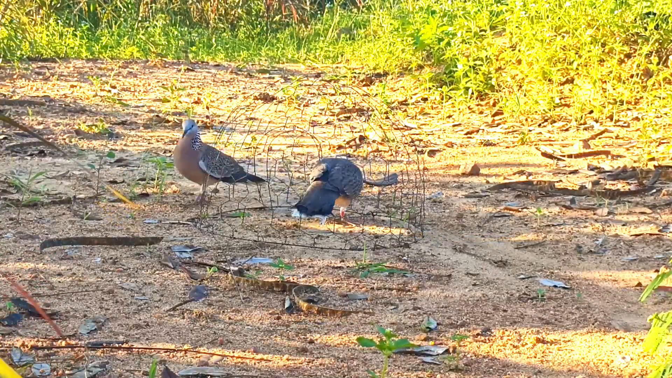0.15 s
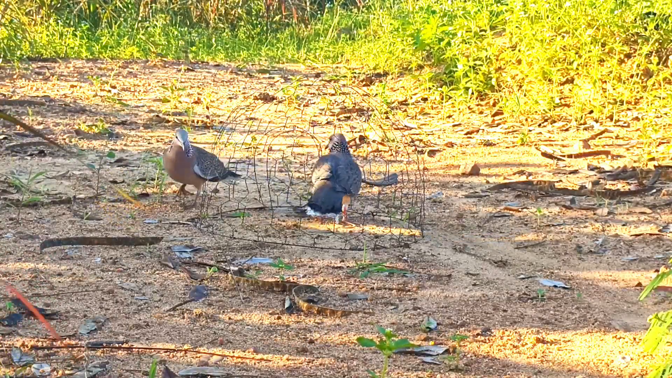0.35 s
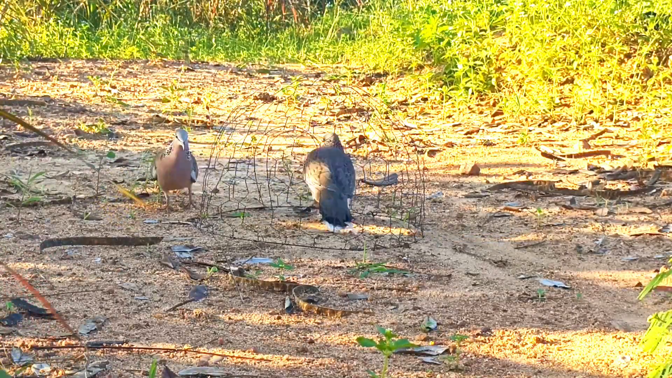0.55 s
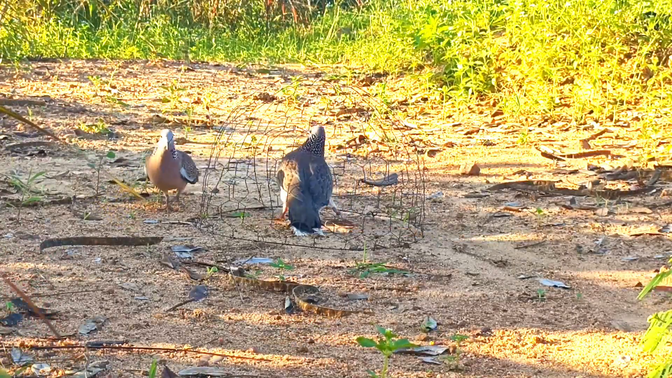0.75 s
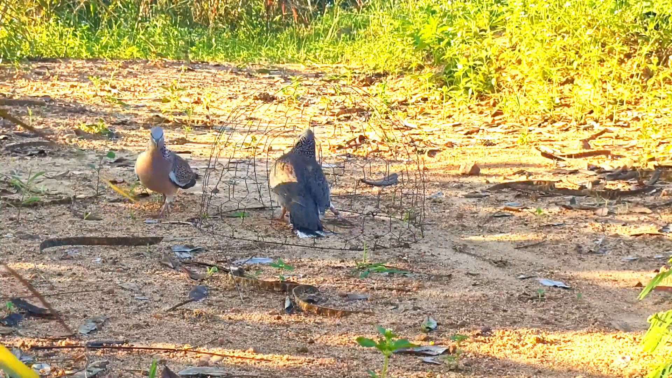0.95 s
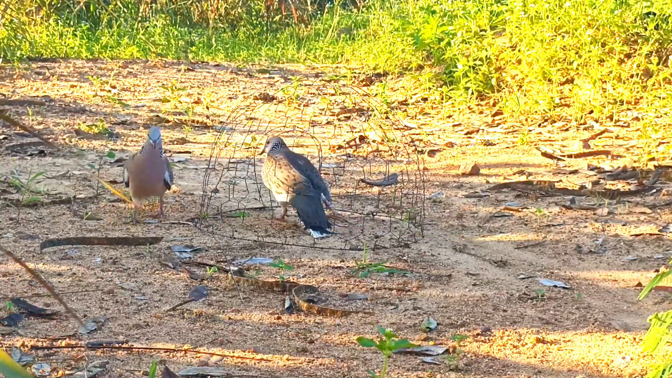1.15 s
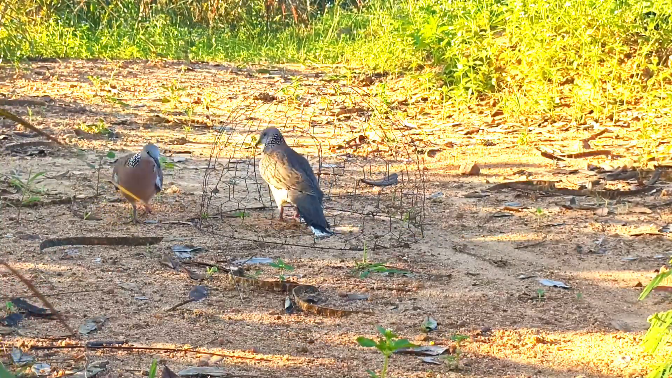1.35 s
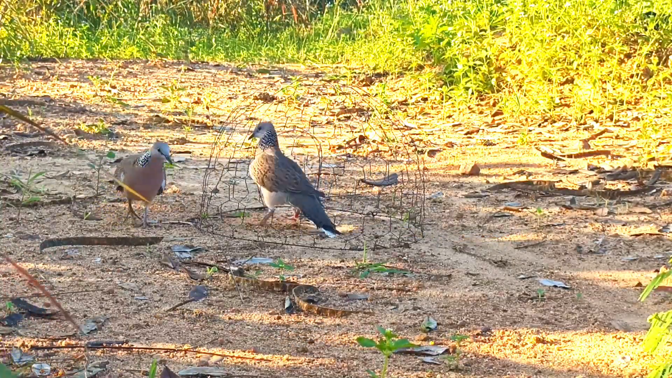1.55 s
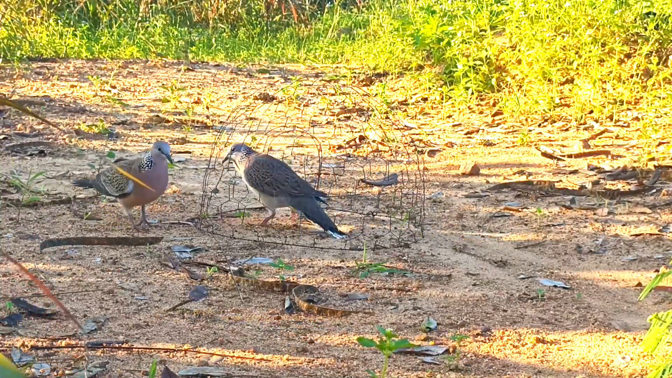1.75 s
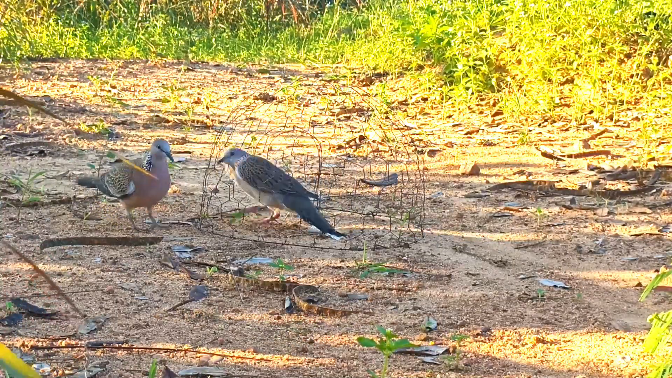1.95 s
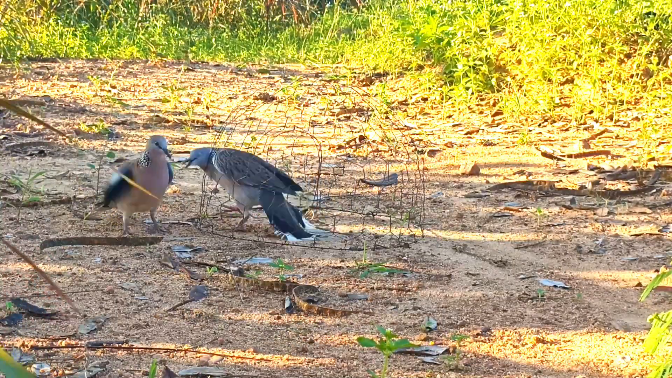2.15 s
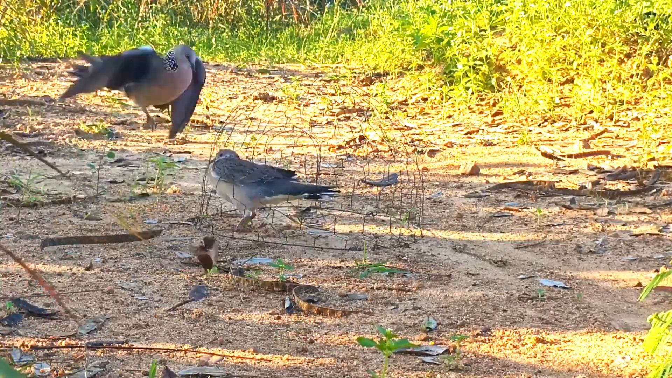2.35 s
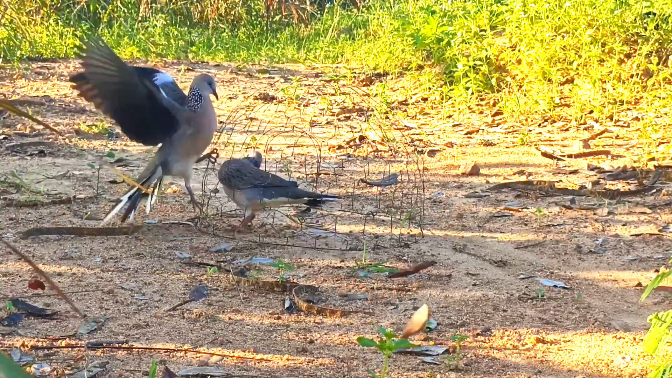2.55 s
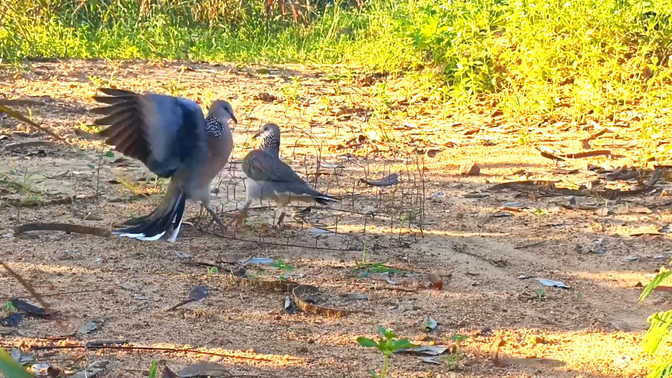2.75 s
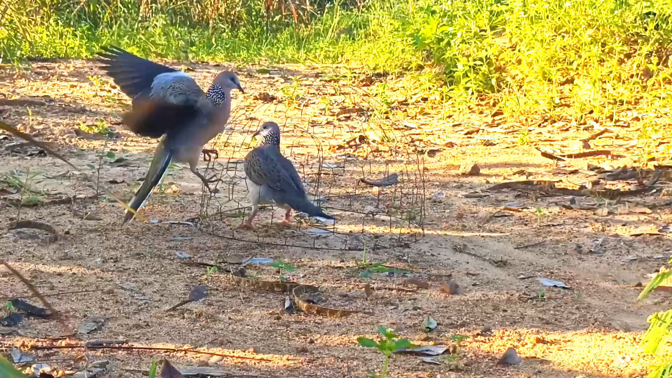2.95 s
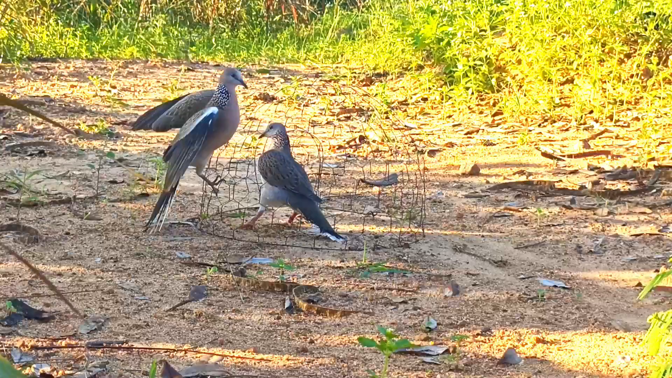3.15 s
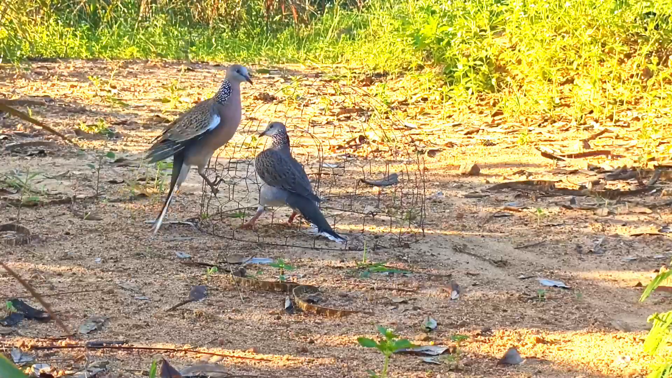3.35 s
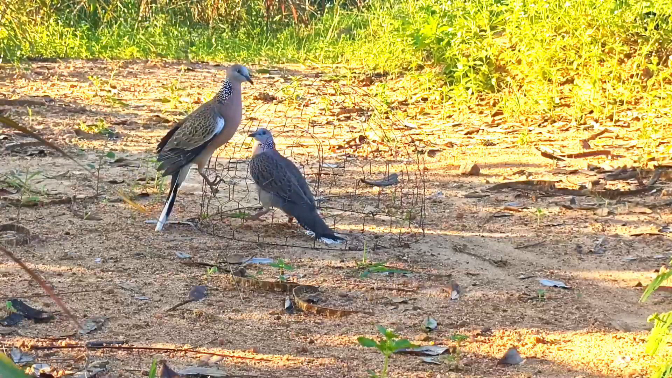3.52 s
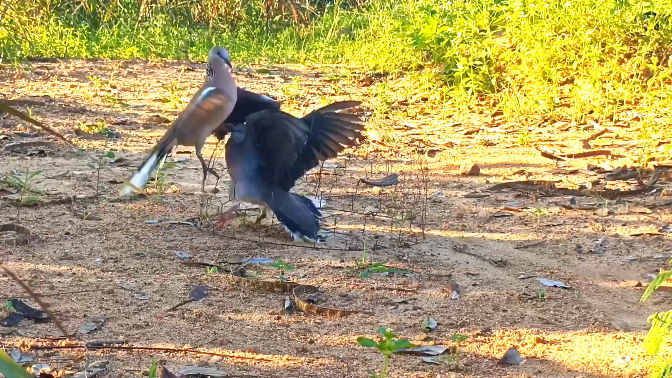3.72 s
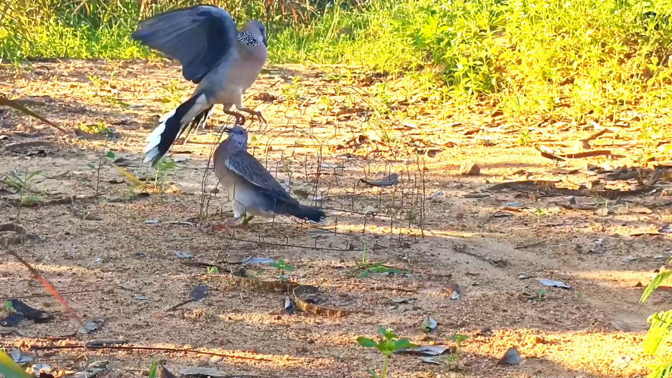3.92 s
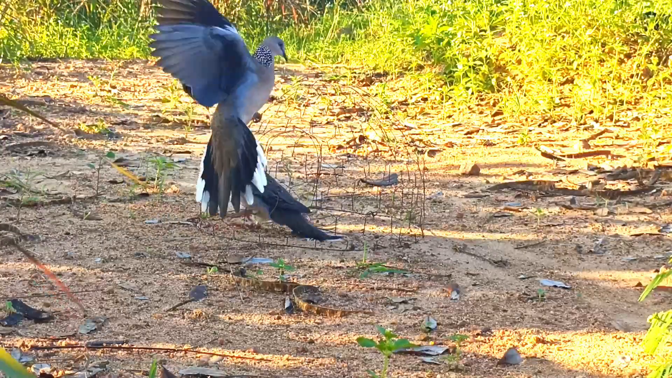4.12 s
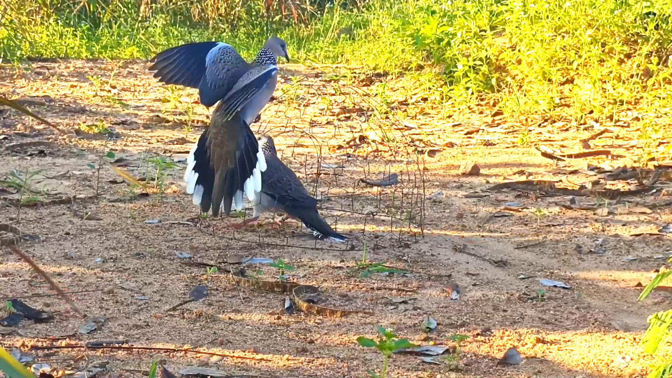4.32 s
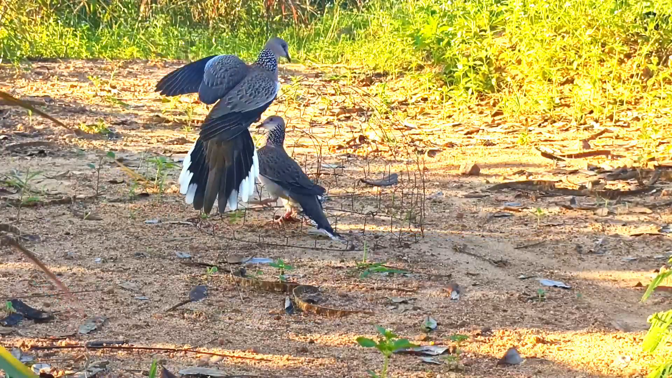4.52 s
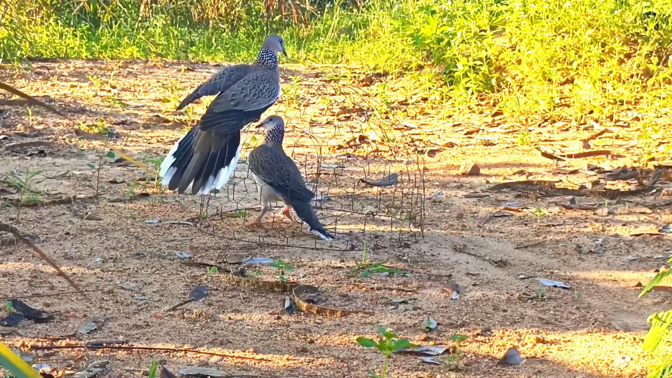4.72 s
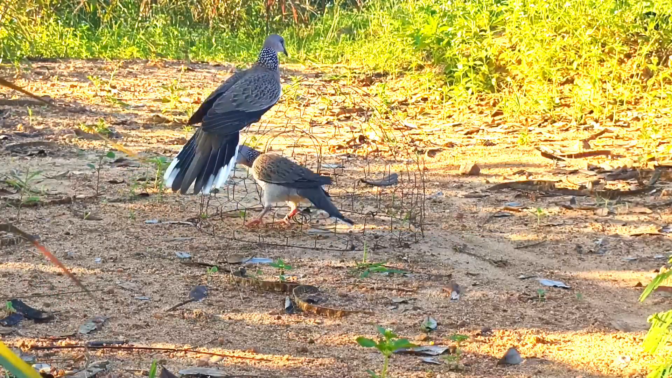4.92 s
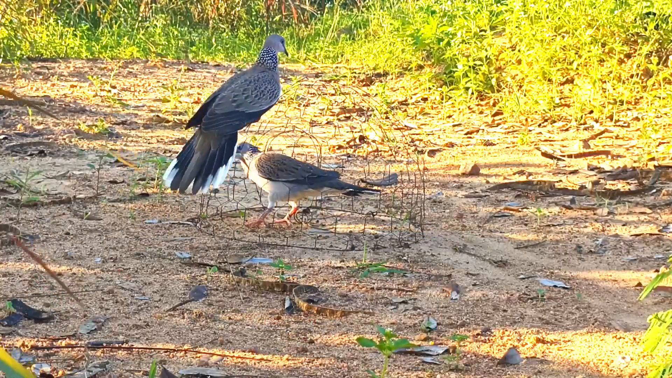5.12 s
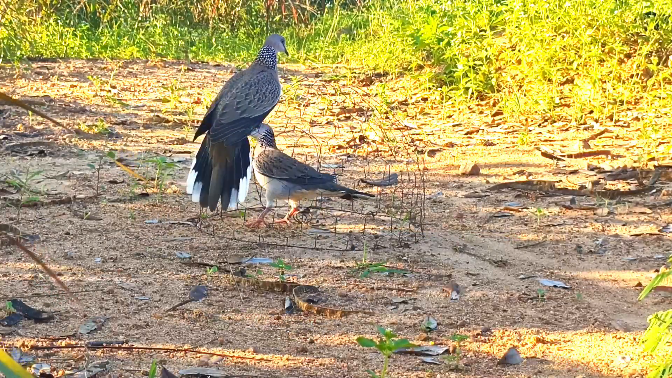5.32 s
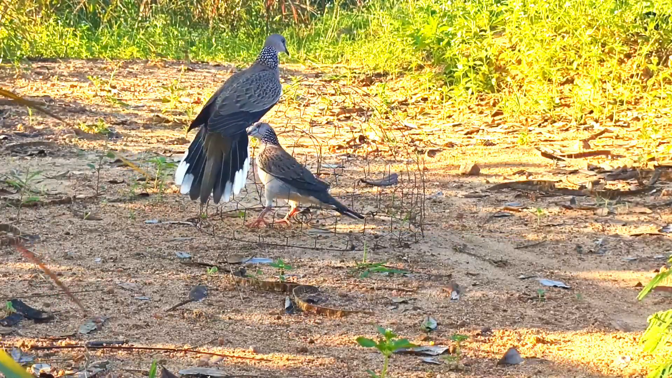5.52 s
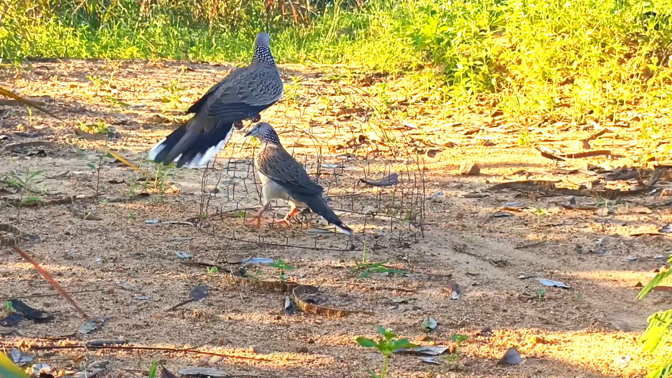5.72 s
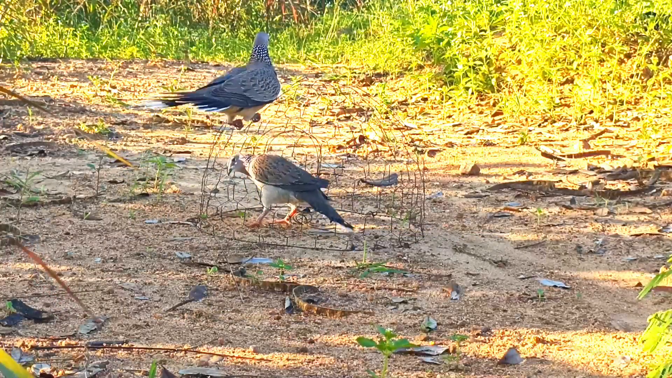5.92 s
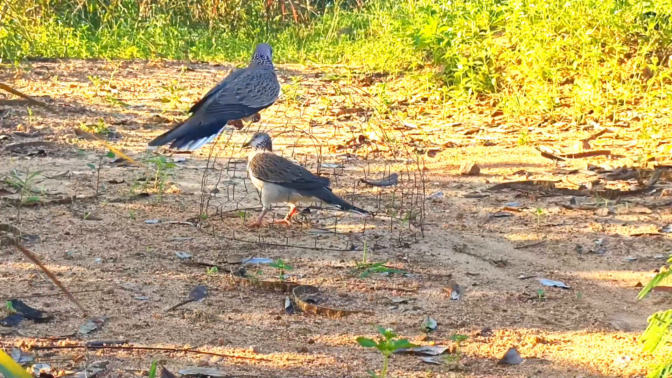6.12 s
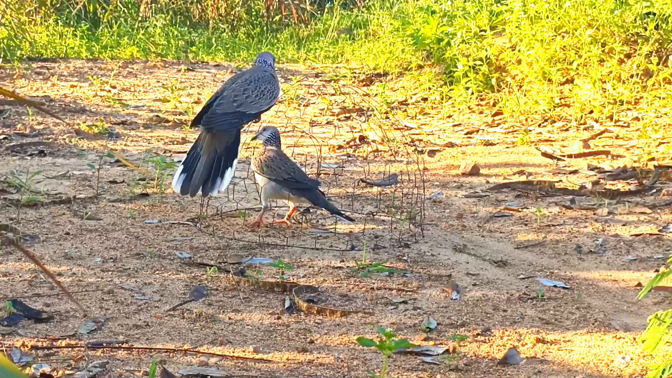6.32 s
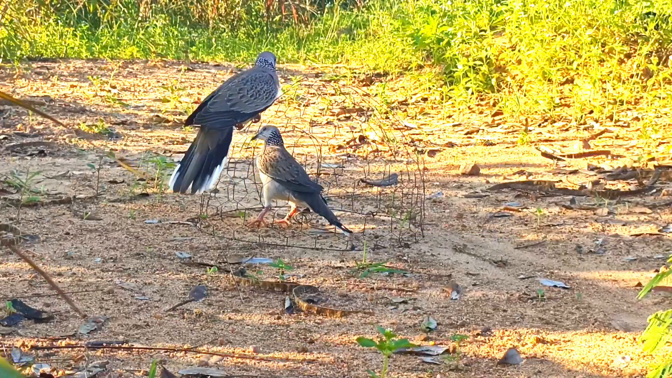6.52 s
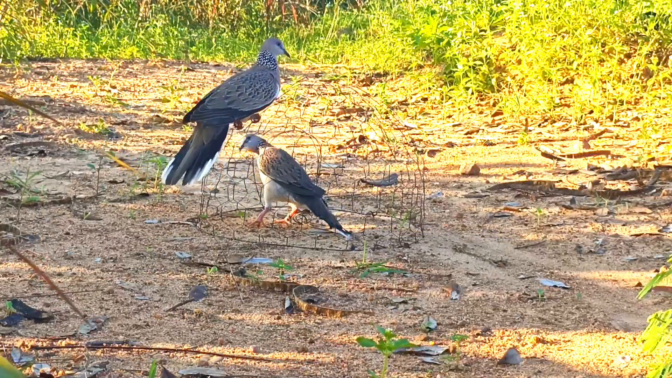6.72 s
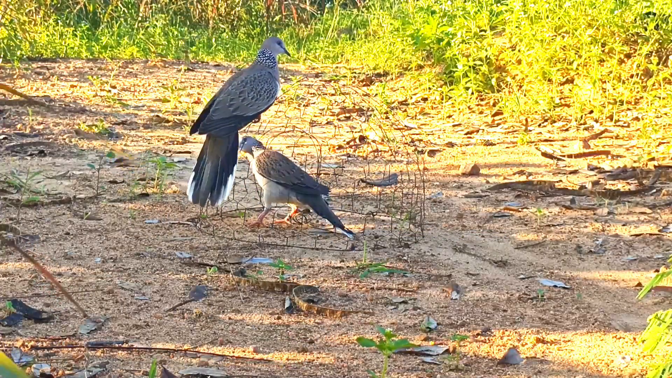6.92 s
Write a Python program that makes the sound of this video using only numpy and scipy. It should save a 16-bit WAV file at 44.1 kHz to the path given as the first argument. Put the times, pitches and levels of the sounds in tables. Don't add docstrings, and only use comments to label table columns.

```python
import sys
import numpy as np
from scipy import signal
from scipy.fft import rfft, irfft, next_fast_len
from scipy.io import wavfile
from scipy.ndimage import map_coordinates

SR = 44100
rng = np.random.default_rng(int(sys.argv[2]) if len(sys.argv) > 2 else 0)


def file_out(sig):
    cols = np.atleast_2d(sig).T
    lim = np.clip(cols, -1, 1)
    pcm = np.round(lim * 32767).astype(np.int16)
    wavfile.write(sys.argv[1], SR, pcm)


def convert_level_to_amplitude(level_db):
    exponent = np.asarray(level_db, float) / 20
    return 10 ** exponent


N = 307328


def unit(x):
    return x / np.sqrt(np.mean(x ** 2) + 1e-20)


def along(points, hz):
    f, v = np.transpose(points)
    return np.interp(np.log(hz + 1), np.log(f + 1), v)


def curves(rows):
    s, *cols = np.transpose(rows)
    return [np.interp(np.arange(N) / SR, s, c) for c in cols]


def gate(rows, fade_s):
    t = np.arange(N) / SR
    return np.clip(np.minimum(t - rows[0][0], rows[-1][0] - t) / fade_s, 0, 1)


def wobble(rate_hz):
    knots = rng.standard_normal(int(N * rate_hz / SR) + 4)
    return map_coordinates(knots, [np.arange(N) * rate_hz / SR])


def noise(spectrum):
    m = next_fast_len(N)
    gain = convert_level_to_amplitude(along(spectrum, np.fft.rfftfreq(m, 1 / SR)))
    return unit(irfft(rfft(rng.standard_normal(m)) * gain, m)[:N])


def narrow(hz, spread_hz, t):
    knots = rng.standard_normal((2, 2 + int(t[-1] * 8000)))
    a, b = (map_coordinates(k, [t * min(spread_hz, 4000) * 2]) for k in knots)
    return (1 + a) * np.sin(2 * np.pi * hz * t) + b * np.cos(2 * np.pi * hz * t)


def burst(t, rise_s, t60_s):
    shape = (1 - np.exp(-t / rise_s)) * convert_level_to_amplitude(-60 * t / t60_s)
    return shape / shape.max()


def add(track, s, sound):
    track[round(s * SR):][:len(sound)] += sound


# t/s, level/dB
AIR_LEVEL = [(0.0, -45.5), (2.37, -45), (2.5, -43.5), (3.03, -43), (3.65, -46), (3.86, -43), (3.94, -39),
             (4.04, -49), (4.21, -50), (5.01, -49), (5.8, -48), (6.97, -46.5)]
# f/Hz, density/dB per Hz
HUM_SPECTRUM = [(21, -63), (35, -6.5), (61, -2.5), (87, -2), (306, -6.5), (376, -9.5), (484, -13),
                (593, -12.5), (1500, -26), (1950, -25), (3300, -120)]
# f/Hz, density/dB per Hz
HISS_SPECTRUM = [(400, -120), (900, -4), (3300, -6), (3700, -11.5), (5500, -13.5), (8500, -16.5),
                 (9300, -15), (9800, -8), (10500, -15), (10900, -16), (11100, -8.5), (13000, -12.5),
                 (15500, -15.5), (15700, -50)]
HISS_DB = -6.5


def air():
    level_db, = curves(AIR_LEVEL)
    roll_db = .8 * wobble(6) + 1.1 * wobble(25)
    hum = convert_level_to_amplitude(level_db - 0.5 + roll_db) * noise(HUM_SPECTRUM)
    return hum + convert_level_to_amplitude(level_db + HISS_DB + 0.44 * wobble(5)) * noise(HISS_SPECTRUM)


# start t/s, end t/s, level/dB
LOW_SINGER_PHRASES = [
    (.22, .79, -56.5),
    (1.42, 1.917, -55),
    (2.6, 2.895, -53.5),
    (3.5, 3.98, -56),
    (4.5, 5.13, -59.5),
    (5.56, 6.205, -56),
    (6.65, 7.1, -61),
]
# start t/s, end t/s, level/dB
HIGH_SINGER_PHRASES = [
    (0, .42, -59.5),
    (1.02, 1.427, -57.5),
    (1.955, 2.558, -57),
    (3.053, 3.453, -59),
    (4.076, 4.384, -63.5),
    (4.948, 5.429, -60),
    (6.099, 6.605, -59.5),
]
# body start f/Hz, body end f/Hz, click rate/Hz
CICADA_VOICES = [
    (7050, 7040, 178),
    (7400, 7190, 192),
]


def cicadas():
    out = np.zeros(N + SR)
    size, drift_rad, pace = convert_level_to_amplitude(2.0 * wobble(90)), 1.46 * wobble(230), 1 + 0.041 * wobble(40)
    singers = zip((LOW_SINGER_PHRASES, HIGH_SINGER_PHRASES), CICADA_VOICES)
    phrases = [row + voice for singer, voice in singers for row in singer]
    for start, end, db, from_hz, to_hz, rate_hz in phrases:
        at = slice(max(0, round(start * SR)), min(N, round(end * SR)))
        u = np.linspace(0, 1, at.stop - at.start)
        beat = np.cumsum(rate_hz * pace[at]) / SR % 1
        body_hz = from_hz + (to_hz - from_hz) * u
        ring = np.sin(2 * np.pi * np.cumsum(body_hz) / SR + drift_rad[at])
        swell = np.minimum(convert_level_to_amplitude(-11 * (1 - u) ** 2), (1 - u) * 9)
        out[at] += convert_level_to_amplitude(db) * swell * unit(beat * np.exp(-beat / 0.25) * size[at] * ring)
    far = noise([(6300, -40), (6750, -4), (7200, 0), (7600, -4), (8100, -40)])
    return out[:N] + convert_level_to_amplitude(curves(AIR_LEVEL)[0] - 18.5 + 0.97 * wobble(2.98)) * far


# t/s, length/s, level/dB, start f/Hz, end f/Hz
WHISTLE_CALLS = [
    (2.866, .115, -38.5, 3050, 3340),
]
# t/s, length/s, level/dB, start f/Hz, end f/Hz
FAINT_BIRD_CALLS = [
    (4.64, 0.13, -58.5, 3210, 3130),
    (5.665, .035, -58, 2600, 3000),
    (5.8, .085, -59, 1685, 1530),
    (5.94, .14, -58.5, 3230, 3090),
]
# t/s, length/s, level/dB, start f/Hz, end f/Hz
COO_CALLS = [
    (.2, .12, -48.5, 542, 537),
    (.61, .1, -45, 505, 541),
    (3.0, 0.13, -45, 531, 508),
    (3.29, 0.12, -44.5, 492, 518),
    (6.28, 0.096, -46, 463, 582),
    (6.36, 0.095, -48, 516, 578),
]
SAG = 0.029


def birds():
    out = np.zeros(N)
    drift, flutter = wobble(70), wobble(45)
    kinds = ((WHISTLE_CALLS, .6, 9.0, .12), (FAINT_BIRD_CALLS, 1.5, 2.6, 1.5), (COO_CALLS, .9, 2.6, 1.5))
    for calls, smear, steep, glide in kinds:
        for s, length_s, db, from_hz, to_hz in calls:
            at = slice(round(s * SR), round((s + length_s) * SR))
            u = np.linspace(0, 1, at.stop - at.start)
            reached = np.expm1(-u / glide) / np.expm1(-1 / glide)
            hz = from_hz + (to_hz - from_hz) * reached - SAG * to_hz * u ** 2
            tone = np.sin(2 * np.pi * np.cumsum(hz) / SR + smear * drift[at])
            swell = np.clip(steep * np.minimum(u, 1 - u), 0, 1)
            out[at] += swell * convert_level_to_amplitude(db + 0.5 + 1.7 * smear * flutter[at]) * tone
    return out


# f/Hz, t60/s
BUSH_T60 = [(200, 0.06), (1500, 0.18), (3200, 0.2), (7000, 0.26), (12000, 0.22)]
# f/Hz, level/dB
BUSH_SPECTRUM = [(200, -2), (1200, -11), (3200, -0.5), (7000, 4.5), (12000, 1.5)]


def bushes(x):
    out = np.zeros(N + SR)
    for k in range(0, N, 2048):
        if not x[k:k + 2048].any():
            continue
        hz, t, z = signal.stft(rng.standard_normal(SR // 5), SR, nperseg=128)
        leaves = convert_level_to_amplitude(2.9 * rng.standard_normal(len(t)))
        decay_db = along(BUSH_SPECTRUM, hz)[:, None] - 60 * t / along(BUSH_T60, hz)[:, None]
        tail = signal.istft(z * leaves * convert_level_to_amplitude(decay_db), SR, nperseg=128)[1]
        add(out, k / SR + .004, signal.fftconvolve(x[k:k + 2048], tail / np.sqrt(SR * 0.014)))
    return out[:N]


# t/s, peak level/dB, f/Hz
BRIGHT_TICKS = [(1.1657, -36, 11700), (1.7893, -38, 12300), (2.3296, -40, 11800), (2.5726, -32, 12300),
                (2.5804, -37, 11300), (2.7364, -39, 11400), (3.1244, -31, 11600), (3.2291, -28, 13000),
                (3.2344, -27, 11600), (3.4251, -34, 13000), (3.5209, -33, 11200), (3.7284, -37, 11300),
                (3.8102, -33, 12400), (4.1874, -35, 11300), (4.2343, -32, 12400), (4.259, -30, 11200),
                (4.2649, -33, 11400), (4.3211, -37, 11300), (4.4268, -37, 11600), (4.8484, -43, 11100),
                (4.8539, -36, 12700), (4.8788, -33, 12700), (4.8834, -32, 13100), (5.3712, -42, 13000),
                (5.3936, -39, 12700), (5.4064, -40, 12200), (5.4306, -40, 12200), (5.6201, -42, 10100),
                (6.5494, -47, 11400)]
# t/s, peak level/dB, f/Hz
DULL_WIRE_TICKS = [
    (2.517, -30, 3500),
    (2.553, -28, 5200),
    (2.559, -28, 5500),
    (2.606, -32, 6200),
    (4.236, -36, 5000),
]
# t/s, level/dB, f/Hz, length/s, spread f/Hz
TWIG_RUSTLES = [(0.865, -39, 1790, 0.0082, 120), (.87, -53, 2380, 0.052, 1014),
                (1.831, -50, 1645, 0.054, 294), (1.927, -51, 1700, 0.049, 312),
                (1.945, -54, 3050, 0.034, 496), (2.546, -45, 2000, 0.0085, 500),
                (2.71, -34, 790, 0.0074, 600), (2.763, -43, 1404, 0.029, 1006),
                (2.795, -38.5, 935, 0.015, 504), (2.845, -50, 900, 0.017, 503),
                (3.217, -48, 1783, 0.049, 905), (3.289, -50.5, 1640, 0.055, 400),
                (4.247, -41.5, 1512, 0.026, 1133), (5.759, -55.5, 500, 0.18, 151),
                (5.782, -59, 998, 0.13, 399), (6.674, -52, 1720, .025, 504),
                (3.215, -44.5, 766, 0.032, 312), (2.372, -27, 1954, 0.012, 890),
                (3.86, -33.5, 596, 0.021, 503), (3.984, -23, 800, 0.013, 297),
                (1.898, -51, 202.7, 0.2, 120), (2.312, -46, 1320, 0.024, 826), (3.949, -42, 696, 0.03, 480)]


def ticks():
    out = np.zeros(N + SR)
    t = np.arange(SR // 50) / SR
    for s, db, hz in BRIGHT_TICKS + DULL_WIRE_TICKS:
        add(out, s, convert_level_to_amplitude(db - 9.5) * narrow(hz, 2040, t) * burst(t, 0.00016, 0.0062))
    t = np.arange(SR // 5) / SR
    for s, db, hz, length_s, spread_hz in TWIG_RUSTLES:
        swell = np.sin(np.pi * np.clip(t / length_s, 0, 1) ** 0.57)
        add(out, s, convert_level_to_amplitude(db) * narrow(hz, spread_hz, t) * swell)
    return out[:N]


# t/s, level/dB
SWISH_EFFORT = [
    [(2.3, -39), (2.386, -22), (2.522, -38.5), (2.918, -39), (3.1, -40.5)],
    [(3.78, -42.5), (3.882, -27.5), (3.942, -33), (4.01, -46), (4.1, -53)],
]
FEATHER_DB = -13.5


def swish():
    out = np.zeros(N)
    for rows in SWISH_EFFORT:
        effort_db, = curves(rows)
        lumps = convert_level_to_amplitude(3.5 * wobble(70))
        pushed = noise([(50, -10), (200, 6.5), (600, 5.0), (1800, -3.0), (4000, -23), (9000, -60)])
        wind = unit(lumps * pushed)
        grains = convert_level_to_amplitude(4.4 * wobble(250))
        rub = unit(grains * (noise(CRACKLE_SPECTRUM) + .5 * noise(SLAP_SPECTRUM)))
        out += gate(rows, 0.028) * convert_level_to_amplitude(effort_db) * (convert_level_to_amplitude(-9) * wind + convert_level_to_amplitude(FEATHER_DB) * rub)
    return out


# t/s, push level/dB, push f/Hz, slap level/dB, crackle level/dB
HARD_BLOWS = [(2.354, -13, 290, -45, -40), (2.3676, -8, 610, -47, -24), (2.3687, -2, 1930, -52, -17),
              (2.3706, -6, 1220, -31, -36.5), (2.3762, -9, 850, -60, -37), (2.3775, -15, 1860, -45, -37),
              (2.4305, -3, 360, -27.5, -26), (2.4608, -13, 720, -36, -17.5),
              (2.6258, -13.5, 675, -16.5, -22), (2.6286, -8, 864, -48, -23), (2.631, -8.5, 930, -36, -20.5),
              (2.9617, -6, 755, -31, -29), (2.9763, -8, 905, -23.5, -20.5), (3.8812, -8, 1100, -22, -30),
              (3.8832, -6.5, 270, -33, -39), (3.8874, -7.5, 620, -20.5, -25.5),
              (3.8886, -6, 1490, -35, -28), (3.8907, -5.5, 483, -22, -21), (3.8955, -14, 540, -34, -28),
              (3.9903, -31, 1310, -25, -12.5), (3.993, -5, 1280, -14, -14.5),
              (3.9942, -5.5, 1100, -29.5, -22), (3.9958, -7, 585, -20.5, -21),
              (3.9986, -2.5, 1160, -43, -38)]
# t/s, length/s, push level/dB, push f/Hz, crackle level/dB
FEATHER_RUFFLES = [(1.941, .001, -30, 400, -52), (2.3396, .011, -28, 480, -50),
                   (2.4385, .001, -20, 350, -40), (2.4646, .013, -11, 756, -23.5),
                   (2.5087, .001, -28, 500, -33), (2.522, .001, -42, 650, -31.5),
                   (2.605, .001, -28, 510, -48), (2.6234, .001, -15.5, 740, -27),
                   (2.645, .001, -26, 470, -58), (2.767, .005, -33, 900, -41),
                   (2.8059, .001, -23, 680, -34.5), (2.8659, .007, -17, 1090, -28.5),
                   (2.881, .001, -31, 1200, -37), (2.9395, .01, -20, 520, -29),
                   (2.9587, .001, -9, 1290, -31), (2.9653, .001, -15.5, 446, -24),
                   (2.9734, .001, -14, 1220, -18), (2.9812, .001, -22, 400, -25),
                   (3.2235, .006, -28, 480, -34), (3.827, .027, -28, 960, -31.5),
                   (3.859, .008, -23, 600, -38), (3.8793, .001, -14, 900, -20.5),
                   (3.953, .02, -24.5, 520, -34), (4.2527, .013, -30.5, 690, -38)]
SNAP_GAP_S, SNAP_SCATTER_DB, PITCH_SCATTER = .0035, 2.1, 0.42
SLAP_UNDER_DB, LATER_DB = -9, 0.4


def snaps():
    rows = list(HARD_BLOWS)
    luck_of_each = rng.standard_normal((len(FEATHER_RUFFLES), 3, 10))
    for (s, length_s, db, hz, crackle_db), luck in zip(FEATHER_RUFFLES, luck_of_each):
        gaps_s = SNAP_GAP_S * np.exp(.25 * luck[0])
        late_s = np.cumsum(gaps_s) - gaps_s[0]
        loose = late_s > 0
        size_db = (SNAP_SCATTER_DB * luck[1] - LATER_DB) * loose
        pitch_hz = hz * np.exp(PITCH_SCATTER * luck[2] * loose)
        barbs_db = crackle_db + size_db - 6 * loose
        row_of_snaps = zip(s + late_s, db + size_db, pitch_hz, barbs_db + SLAP_UNDER_DB, barbs_db)
        rows += [row for row in row_of_snaps if row[0] <= s + length_s]
    return rows


# f/Hz, level/dB
SLAP_SPECTRUM = [(800, -25), (2200, -0.5), (3200, 6), (4500, 1), (6000, -6.5), (8500, -17)]
# f/Hz, level/dB
CRACKLE_SPECTRUM = [(5000, -25), (8500, -9.5), (10000, -6), (11500, 2.5), (13500, -3), (15400, -7),
                    (16800, -39)]


def claps():
    push, slap, crackle = np.zeros((3, N + SR))
    t = np.arange(SR // 30) / SR
    lead_s = .006
    for s, db, hz, slap_db, crackle_db in snaps():
        u = (t - lead_s) * hz
        life = .5 + 0.43 * (hz / 1000) ** 2
        bell = np.where(u < 0, np.exp(-(u / .5) ** 4), np.exp(-np.abs(u) / life))
        swing = -np.cos(2 * np.pi * u) * bell
        edge = -.4 / (1 + (hz / 900) ** 4) * np.sin(2 * np.pi * 2.52 * u) * bell ** 2
        after_s = np.maximum(t - lead_s + 0.0016, 0)
        thud = -.2 * np.sin(2 * np.pi * rng.uniform(83, 304) * after_s) * np.exp(-after_s / 0.0065)
        add(push, s - lead_s, convert_level_to_amplitude(db - 0.5) * (swing + edge + thud))
        add(slap, s - .0004, convert_level_to_amplitude(slap_db) * burst(t, 0.000045, 0.017))
        add(crackle, s - .0004, convert_level_to_amplitude(crackle_db) * burst(t, 0.000088, 0.013))
    return push[:N] + slap[:N] * noise(SLAP_SPECTRUM) + crackle[:N] * noise(CRACKLE_SPECTRUM)


def scene():
    near = claps() + ticks()
    return (near + convert_level_to_amplitude(-13) * bushes(near) + swish() + birds() + cicadas() + air())[None]


def top_cut(x):
    return signal.sosfilt(signal.butter(12, 16450, fs=SR, output="sos"), x)


# f/Hz, gain/dB
MIC_RESPONSE = [(15, -22), (45, -11.5), (90, 2), (15500, -1), (15700, -20), (16600, -40), (17500, -80)]


def record(dry):
    m = next_fast_len(N + 8192)
    gain = convert_level_to_amplitude(along(MIC_RESPONSE, np.fft.rfftfreq(m, 1 / SR)))
    heard = irfft(rfft(dry, m) * gain, m)[:, :N]
    mix = np.clip(heard - .0011, -1, 1)
    return top_cut(mix)


dry = scene()
out = record(dry)
file_out(out)
```